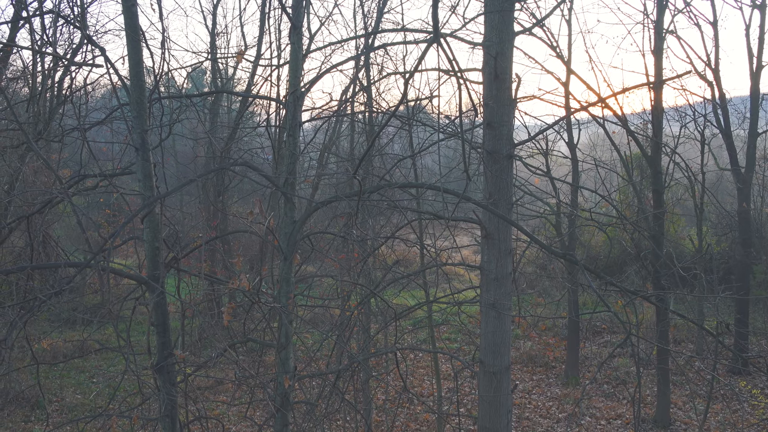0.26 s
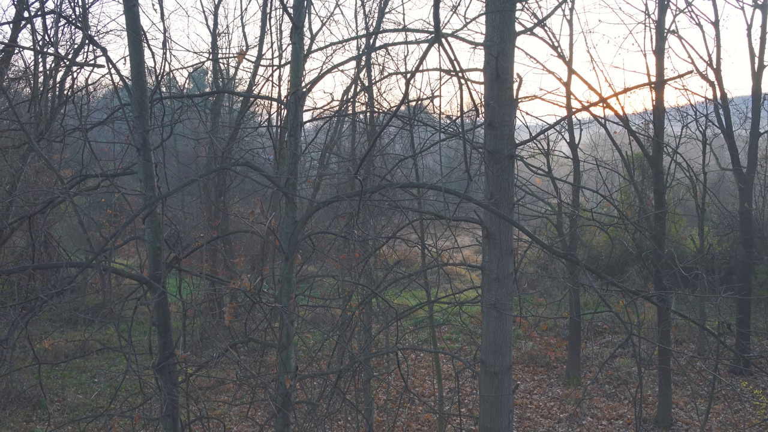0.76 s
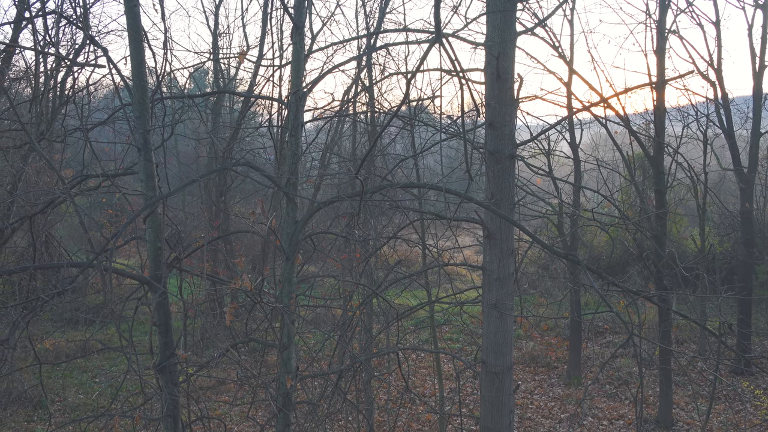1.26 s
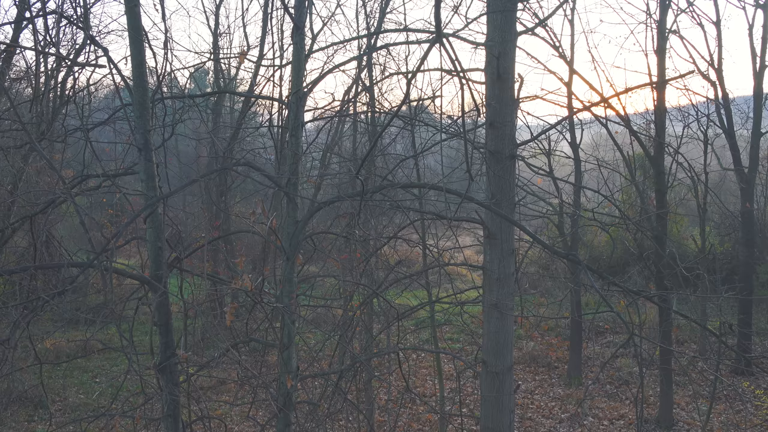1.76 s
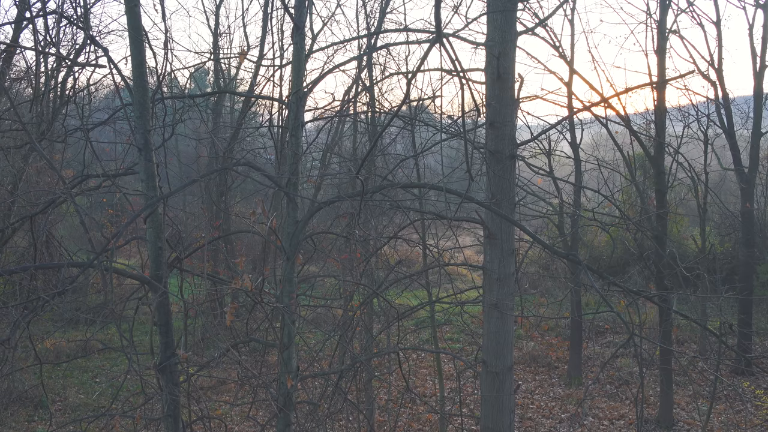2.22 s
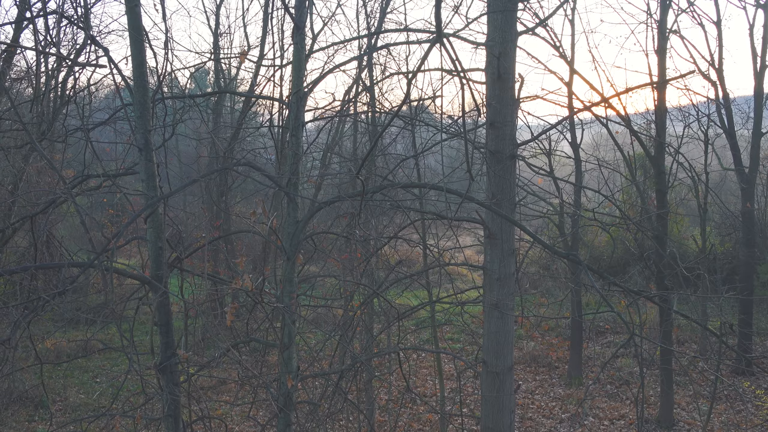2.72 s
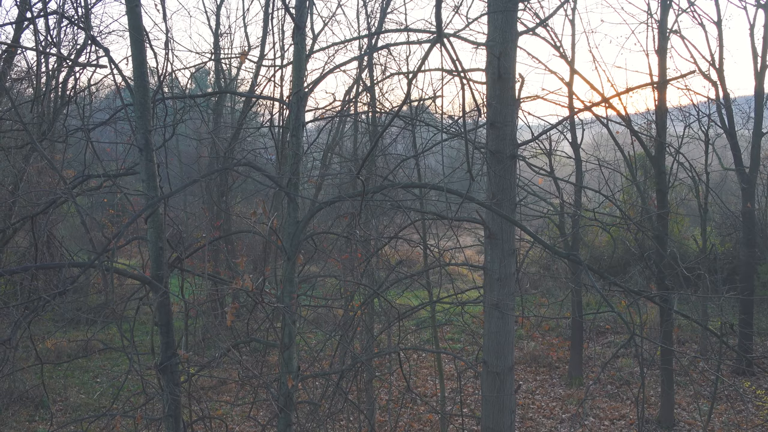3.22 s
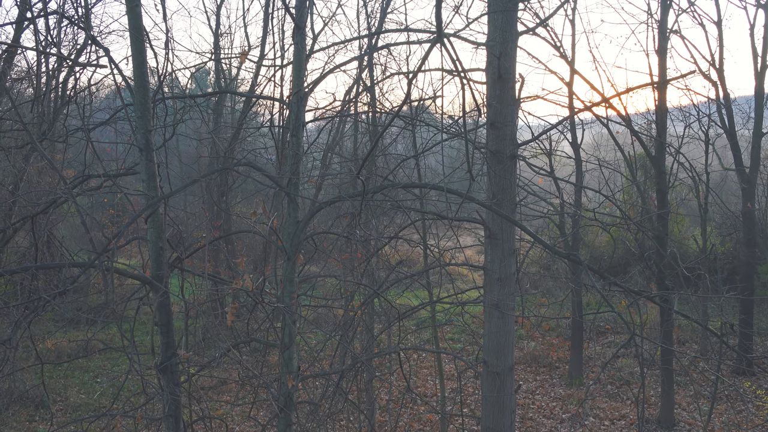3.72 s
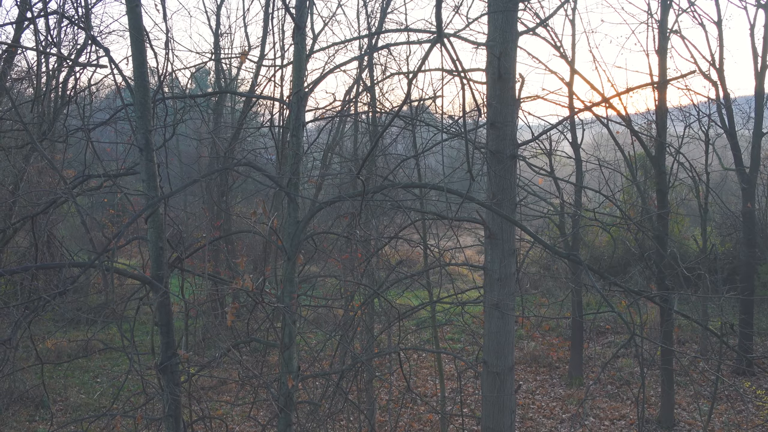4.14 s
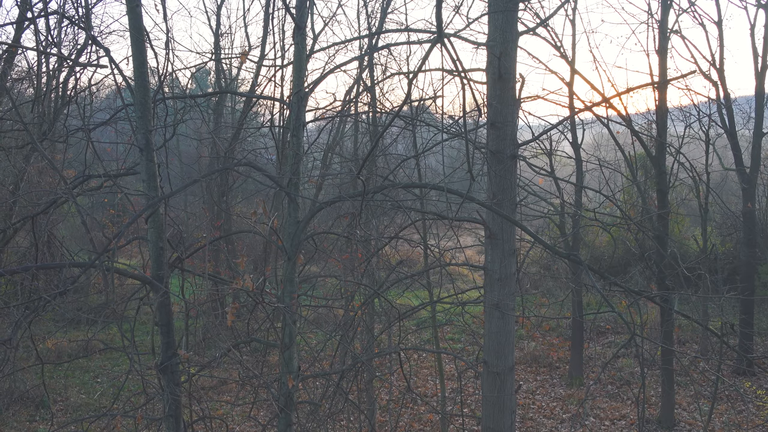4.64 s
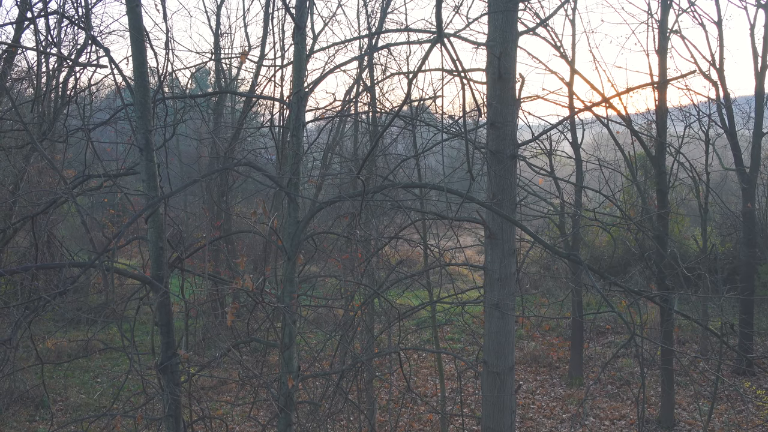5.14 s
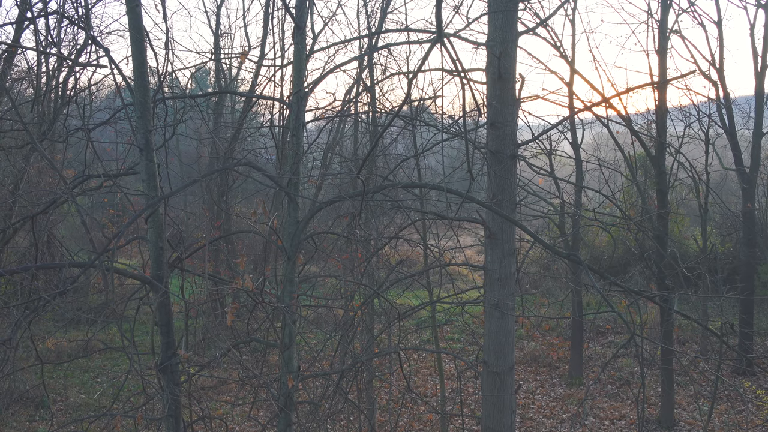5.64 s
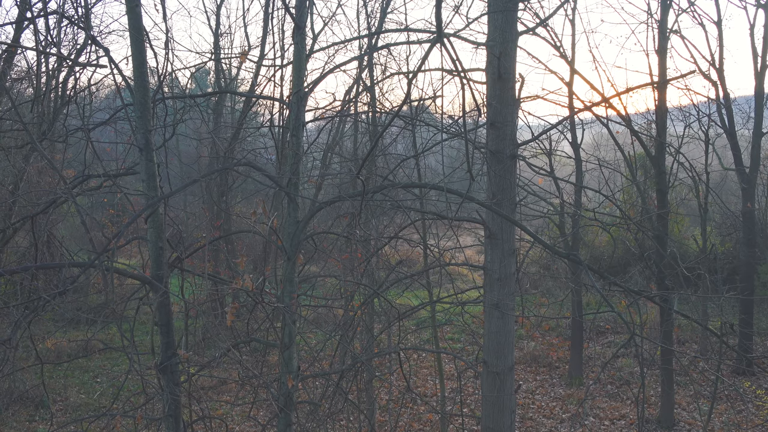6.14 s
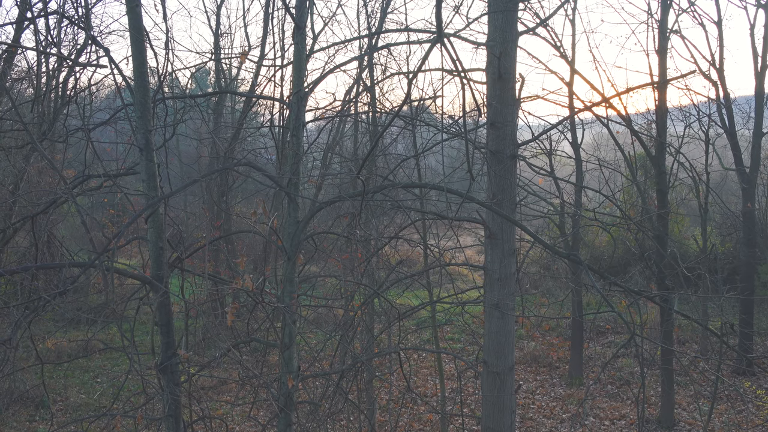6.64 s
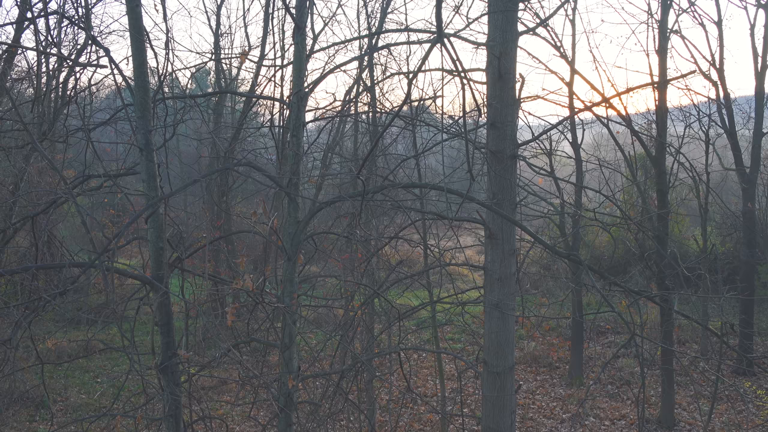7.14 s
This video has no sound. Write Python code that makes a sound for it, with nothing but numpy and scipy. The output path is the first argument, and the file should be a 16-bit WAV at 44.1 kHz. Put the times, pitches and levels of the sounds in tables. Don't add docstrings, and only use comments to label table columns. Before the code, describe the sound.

Overlapping crow caws echo softly among leafless trunks over a distant flock's haze, with thin songbird chirps, paired jay whistles and faint hum.

```python
import sys
import numpy as np
from scipy import signal
from scipy.fft import rfft, irfft, next_fast_len
from scipy.io import wavfile

SR = 44100
rng = np.random.default_rng(int(sys.argv[2]) if len(sys.argv) > 2 else 0)


def put_to_file(sound):
    columns = np.atleast_2d(sound).T
    safe = np.clip(columns, -1, 1)
    whole_steps = np.round(safe * 32767)
    wavfile.write(sys.argv[1], SR, whole_steps.astype(np.int16))


def to_linear_factor(level_db):
    exponent = np.asarray(level_db, float) / 20
    return 10 ** exponent


N = 325017

# peak in seconds, tail in seconds, level in dB, third partial in dB relative to the level.
TWO_LINE_CAWS = [(.02, 0.06, -39, -14), (.73, .05, -61, 2), (1.091, 0.076, -48, -1),
                 (2.228, 0.11, -49, -1.5), (3.988, 0.12, -43.5, -2.5), (4.346, 0.12, -43, 0.5),
                 (4.648, 0.15, -44.5, -2.5), (5.024, 0.073, -46, 2), (5.69, .16, -46.5, 0),
                 (6.088, .19, -44.5, -4), (6.452, 0.17, -42, -8), (6.93, 0.15, -42.5, -7.5),
                 (7.093, 0.082, -60, -13), (7.27, 0.12, -45, -6.5)]
HIGH_CAWS = [(1.42, 0.22, -51, -9), (1.871, 0.18, -57, -22), (2.788, 0.093, -54, -8),
             (2.991, 0.091, -50.5, -25), (3.228, 0.16, -46, -9)]
# peak in seconds, tail in seconds, level in dB.
ONE_LINE_CAWS = [(.42, 0.2, -46.5), (.814, 0.087, -46), (1.166, 0.097, -43.5), (1.491, 0.13, -50),
                 (1.831, 0.082, -44), (2.096, 0.067, -45), (2.447, 0.086, -45), (2.728, 0.1, -42.5)]
NEIGHBOUR_CAWS = [(4.7, 0.059, -46), (4.979, 0.039, -49), (5.096, 0.058, -40), (5.757, 0.069, -45),
                  (5.969, 0.036, -49), (6.171, 0.041, -45), (6.919, 0.099, -56), (7.128, 0.077, -43.5),
                  (7.33, .06, -58)]
# pitch in Hz, attack in seconds, rise in dB, fall in dB.
THROATS = [
    (600, .052, 9, 12),
    (655, .08, 9, 14),
    (499, .06, 8, 13),
    (487, .055, 8, 10),
]
# multiple of the pitch, level in dB.
TWO_LINE_PARTIALS = [(2, 0), (2.5, -5), (3.5, -19), (4, -25), (5, -24), (5.5, -24), (6, -25)]
# multiple of the pitch, level in dB.
ONE_LINE_PARTIALS = [(2.5, -12), (3, 0), (3.5, -16), (5, -25), (6.5, -28)]
# start in seconds, length in seconds, strongest partial from Hz, to Hz, level in dB.
SLIDING_CAWS = [(0, 0.064, 1876, 1687, -46.5), (.03, 0.2, 1740, 1387, -46), (3.505, 0.041, 1370, 1900, -58),
                (3.532, 0.11, 1873, 1582, -49.5), (3.619, 0.22, 1555, 1792, -51.5),
                (3.76, 0.19, 1565, 1480, -57), (3.926, 0.076, 1640, 1816, -45.5),
                (4.0, 0.099, 1750, 1380, -46), (4.09, 0.08, 1438, 1487, -46.5),
                (4.32, .19, 1637, 1396, -49.5), (6.47, 0.25, 1717, 1430, -51),
                (5.19, 0.082, 914, 681, -50.5)]
# share of the length, share of the slide, level in dB.
SLIDE_SHAPE = [(0, 0.025, 0.5), (0.252, .45, -1), (.6, .75, -0.5), (1, 1, -8)]
# multiple of the strongest partial, level in dB.
SLIDE_PARTIALS = [(0.668, -26), (1, 3), (1.332, -19), (1.667, -21), (2.001, -27)]
# start in seconds, length in seconds, top of second partial in Hz, level in dB.
NEAR_CAWS = [
    (5.174, .325, 1144, -34.5),
    (5.724, 0.28, 1148, -49.5),
]
# share of the length, share of the top pitch, level in dB.
NEAR_SHAPE = [(0, .87, -14), (.1, .84, -4), (.2, .9, -2), (.25, .9, -6), (.29, .98, 0), (.45, 1, -2),
              (.57, .94, 0), (.76, .85, -2), (.86, .77, -10), (1, .76, -28)]
# multiple of the pitch, level in dB.
NEAR_PARTIALS = [(1.25, -20), (1.5, -19), (1.75, -16), (2, 0), (2.25, -16), (2.5, -15), (3.25, -16),
                 (4, -13), (5, -22), (6, -24)]
# start in seconds, hold in seconds, release in seconds, level in dB.
RASPS = [
    (-.1, 0.11, 0.22, -63.5),
    (3.947, 0.1, 0.11, -69),
    (5.172, 0.17, 0.21, -55),
]
# frequency in Hz, density in dB per Hz.
RASP_SPECTRUM = [(480, -40), (680, -20), (1400, -15), (2100, -19), (2600, -24), (3400, -21), (5600, -26),
                 (8000, -36), (11000, -52), (14000, -90)]
# start in seconds, length in seconds, top of fourth partial in Hz, level in dB.
JAY_WHISTLES = [
    (2.472, 0.33, 3570, -53),
    (3.205, 0.36, 3582, -55),
    (5.637, .335, 3567, -53.5),
    (6.349, 0.352, 3575, -55),
]
# share of the length, share of the top pitch, level in dB.
JAY_SHAPE = [(-.025, .82, -14), (0, .94, -7), (.075, 1, 0), (.4, .982, -1.5), (.89, .918, -1.5),
             (.99, .895, -3), (1.03, .79, -8)]
# multiple of the pitch, level in dB.
JAY_PARTIALS = [(2, -12), (3, -11), (4, 0), (6, -18), (7, -29), (8, -29)]
# start in seconds, top of second partial in Hz, its end in Hz, level in dB,
# third partial in dB relative to the level.
CHIPS = [(.172, 4300, 3200, -61.5, 0), (.851, 4050, 3970, -61.5, 7), (.859, 4280, 3770, -60, -20),
         (1.364, 4620, 3010, -55.5, -23), (1.365, 4050, 4000, -57.5, 2.5), (2.2, 4130, 4070, -57.5, 1),
         (2.205, 4460, 3660, -57.5, -20), (2.82, 3615, 3160, -53, 4.5), (2.833, 4230, 3950, -56, -8),
         (3.066, 3710, 3310, -64, 6), (3.076, 4130, 3040, -65, -16), (3.598, 3950, 3360, -60.5, -12),
         (4.068, 4310, 3460, -56.5, -5), (4.516, 4020, 2920, -55.5, -3.5), (5.143, 3720, 3390, -55.5, -1),
         (5.146, 4310, 3730, -53, -7), (5.591, 4600, 3520, -66.5, -25), (5.871, 4210, 3570, -51.5, -8.5),
         (6.205, 4490, 3550, -63, -20), (6.475, 4450, 3690, -56, -22), (6.476, 4070, 3930, -60, 4),
         (6.884, 3980, 3590, -64.5, -3), (7.137, 3830, 3000, -62.5, 2)]
# multiple of the pitch, level in dB.
CHIP_PARTIALS = [(1, -3), (2, 2.5), (4, -28)]
# start in seconds, length in seconds, lowest pitch in Hz, level in dB.
SEEPS = [
    (0.244, 0.14, 7310, -52.5),
    (1.38, 0.1, 7430, -61.5),
    (3.174, 0.15, 7150, -56),
    (4.922, 0.11, 7420, -47.5),
]
# share of the length, share of the lowest pitch, level in dB.
SEEP_SHAPE = [(0, 1.22, -11), (.14, 1.075, -4), (.32, 1.025, 0), (.65, 1, -2), (1, 1.01, -12)]
# start in seconds, from Hz, top in Hz, level in dB.
WARBLES = [(.352, 7980, 8560, -58), (1.462, 7400, 8300, -63), (3.27, 7620, 8680, -51),
           (3.31, 7900, 9000, -60), (5.0, 7760, 8900, -40.5), (5.03, 7730, 9240, -47)]
# seconds after its start, share of the leap, level in dB.
WARBLE_SHAPE = [(0, 0, -3), (.011, 1, -8), (.021, .3, -1), (.034, 0, -6)]
# start in seconds,
# length in seconds, from Hz, to Hz, level in dB.
PEEPS = [(6.685, .018, 5240, 6300, -58), (6.706, .02, 6350, 5700, -58), (6.825, .03, 5900, 5100, -60),
         (5.48, .07, 2650, 2480, -60), (5.56, .06, 2600, 2450, -63), (3.79, .09, 2880, 2740, -71),
         (3.82, .05, 2450, 2350, -64), (3.88, .08, 4020, 4050, -68), (6.865, .08, 2700, 2660, -66),
         (.9, .3, 4050, 4020, -72), (5.21, .045, 6260, 5800, -55), (5.6, .015, 8500, 8900, -66),
         (7.115, .02, 6900, 6800, -66), (.262, .08, 8500, 8000, -55), (1.385, .07, 8650, 8250, -69),
         (3.195, .07, 8100, 7600, -63)]
# start in seconds, from Hz, to Hz, level in dB.
FLICKS = [(.665, 5200, 7150, -63), (1.528, 5430, 7300, -68), (1.932, 5140, 7240, -64.5),
          (2.59, 5380, 7360, -63.5), (3.243, 5550, 7200, -68), (4.004, 5850, 6900, -68),
          (4.44, 5900, 7270, -67.5)]
# time in seconds, level in dB.
FLOCK_LEVEL = [(0.0, -38), (0.14, -40.5), (.27, -48.5), (.5, -50.5), (0.92, -54.5), (1.33, -53),
               (1.68, -55), (2.4, -50.5), (3.18, -53.5), (3.35, -66), (3.59, -55), (3.75, -50.5),
               (4.21, -45.5), (4.99, -48.5), (5.23, -45), (5.77, -50), (6.8, -48), (7.08, -48.5),
               (7.37, -49.5)]
# frequency in Hz, 60 dB decay time in seconds.
WOOD_DECAY = [(800, 1), (3000, 0.75), (8000, 0.3)]
# time in seconds, level in dB.
WIND_LEVEL = [(0.0, -36), (0.1, -30), (1.19, -38), (1.99, -38), (2.13, -30), (2.26, -36), (2.71, -30.5),
              (3.12, -36), (3.76, -37.5), (4.53, -30.5), (4.7, -43.5), (4.91, -31.5), (5.48, -40.5),
              (5.97, -31.5), (6.44, -39.5), (7.18, -27.5), (7.37, -37.5)]
# frequency in Hz, density in dB per Hz.
WIND_SPECTRUM = [(2, -14), (5, -3), (11, 0), (17, -6), (25, -13), (31, -19.5), (40, -27), (60, -36),
                 (150, -60), (200, -120)]
# frequency in Hz, density in dB per Hz.
HUM_HISS_SPECTRUM = [(26, -40), (45, -3), (162, -3.5), (207, -7.5), (346, -8.5), (391, -10.5), (465, -10),
                     (902, -11.5), (1630, -19.5), (1800, -20.5), (2530, -28.5), (2940, -32.5),
                     (3400, -34.5), (4140, -32.5), (16000, -41.5)]

HOARSE, FLUTTER = .02, .7
ARCH, SAG = .07, 1.45
RASP_ATTACK_S, RASP_RISE_DB, RASP_FALL_DB = .06, 10, 16
CHIP_RISE_S, CHIP_FALL_S, CHIP_FALL_S_PER_KHZ = 0.012, 0.0141, .016
TRUNK_S, TRUNK_DB = .013, -5
PEEP_FADE_DB = 3
HUM_HISS_DB = -48
TOP_HZ = 15730


def crows():
    out = np.zeros(N)
    caw_lists = [TWO_LINE_CAWS, HIGH_CAWS, ONE_LINE_CAWS, NEIGHBOUR_CAWS]
    partials = [TWO_LINE_PARTIALS, TWO_LINE_PARTIALS, ONE_LINE_PARTIALS, ONE_LINE_PARTIALS]
    for caws, (hz, attack, rise_db, fall_db), orders in zip(caw_lists, THROATS, partials):
        for s, tail, db, *third_db in caws:
            onset = (max(s - attack, 0), db - rise_db * min(s / attack, 1))
            swell = [onset, (s, db), (s + tail, db - fall_db)]
            caw = [(t, hz, a, *(a + b for b in third_db)) for t, a in swell]
            add_call(out, caw, orders, line=0.97, jitter=HOARSE, rough=FLUTTER, arch=ARCH * (s > attack))
    for s, long, from_hz, to_hz, db in SLIDING_CAWS:
        caw = [(s + u * long, from_hz + v * (to_hz - from_hz), db + a) for u, v, a in SLIDE_SHAPE]
        add_call(out, caw, SLIDE_PARTIALS, line=1, jitter=.9 * HOARSE, rough=.6 * FLUTTER)
    return out


def near_crow():
    out = rasp()
    for caw in NEAR_CAWS:
        add_call(out, shaped(NEAR_SHAPE, *caw), NEAR_PARTIALS, line=2, jitter=.022, rough=.35, fade=.008)
    return out


def rasp():
    envelope, t = np.zeros(N), np.arange(N) / SR
    chopped = rng.standard_normal(N) * to_linear_factor(1.05 * wobble(140))
    breath = coloured(chopped, RASP_SPECTRUM)
    for s, hold, release, db in RASPS:
        full = max(s + RASP_ATTACK_S, 0)
        end = full + hold + release
        knots = np.array([s - .03, s, s + RASP_ATTACK_S, full + hold, end, end + 0.054])
        levels = [-60, -RASP_RISE_DB, -1.5, 0, -RASP_FALL_DB, -60]
        envelope += to_linear_factor(db + 10.5 + np.interp(t, knots, levels))
    return envelope * breath


def jay():
    out = np.zeros(N)
    for whistle in JAY_WHISTLES:
        add_call(out, shaped(JAY_SHAPE, *whistle), JAY_PARTIALS, line=4, jitter=.004, rough=.22, fade=.005)
    return out


def songbirds():
    hooked = to_linear_factor(-1.8) * wood(chips(), wet_db=-2.5, stretch=.8, far_db=-7)
    thin = to_linear_factor(-4) * wood(seeps(), wet_db=3, stretch=1.2, far_db=1.5)
    return hooked + thin + wood(flicks(), wet_db=7, stretch=1.3, far_db=6)


def chips():
    out = np.zeros(N)
    for s, top_hz, end_hz, db, third_db in CHIPS:
        fall = CHIP_FALL_S + CHIP_FALL_S_PER_KHZ * abs(top_hz - end_hz) / 1000
        hook = [(0, .7 * top_hz, -5, -15),
                (0.6 * CHIP_RISE_S, .92 * top_hz, -2, -4),
                (CHIP_RISE_S, top_hz, 0, 0),
                (CHIP_RISE_S + 0.5 * fall, .4 * top_hz + .6 * end_hz, -1, -9),
                (CHIP_RISE_S + fall, end_hz, -5, -28)]
        chip = [(s + t, hz, db + a, db + third_db + b) for t, hz, a, b in hook]
        add_call(out, chip, CHIP_PARTIALS, line=2, jitter=.012, rough=.3, fade=.002)
    return out + to_linear_factor(TRUNK_DB) * np.roll(out, round(TRUNK_S * SR))


def seeps():
    out = np.zeros(N)
    calls = [shaped(SEEP_SHAPE, *seep) for seep in SEEPS]
    for s, low_hz, top_hz, db in WARBLES:
        calls.append([(s + t, low_hz + v * (top_hz - low_hz), db + a) for t, v, a in WARBLE_SHAPE])
    for s, long, from_hz, to_hz, db in PEEPS:
        calls.append([(s, from_hz, db), (s + long, to_hz, db - PEEP_FADE_DB)])
    for call in calls:
        add_call(out, call, [(1, 0)], line=1, jitter=.013, rough=.4, fade=.003)
    return out


def flicks():
    out = np.zeros(N)
    for s, from_hz, to_hz, db in FLICKS:
        flick = [(s, from_hz, db), (s + .014, .95 * to_hz, db - 2.5), (s + .022, to_hz, db - 8)]
        add_call(out, flick, [(1, 0)], line=0.99, jitter=0.0077, fade=0.0018)
    return out


def flock(count=120):
    caws = np.zeros(N)
    for when, pitch, size, length in rng.random((count, 4)):
        s, hz, long = when * N / SR, 440 + 200 * pitch, 0.1202 + 0.1229 * length
        arch = [(s, .93 * hz, -6), (s + 0.3897 * long, hz, 0), (s + long, .9 * hz, -8)]
        partials = [(2, -4 - 6 * size), (3, -6 * size)]
        add_call(caws, arch, partials, line=0.99, jitter=2.61 * HOARSE, rough=1.26 * FLUTTER)
    caws = coloured(caws, [(700, -39), (1100, -12.0), (1250, 2.5), (1550, -1.0), (1800, -5.5),
                           (2050, -12), (4000, -37)])
    breath = coloured(rng.standard_normal(N), [(1800, -30), (2250, -1), (2850, -5), (3500, -1),
                                               (4400, -13), (6500, -28), (9000, -50)])
    blur = coloured(rng.standard_normal(N), [(800, -38), (1150, -1.0), (1520, -4), (1850, -3.5),
                                             (2200, -16.5), (4000, -57)])
    haze = to_linear_factor(-14.5 + 1.5 * wobble(6)) * breath + to_linear_factor(-3 + 2.5 * wobble(9)) * blur
    s, db = np.transpose(FLOCK_LEVEL)
    return (caws + haze) * to_linear_factor(np.interp(np.arange(N) / SR, s, db) - 4.5)


def air():
    s, db = np.transpose(WIND_LEVEL)
    gusts = to_linear_factor(np.interp(np.arange(N) / SR, s, db))
    wind = gusts * coloured(rng.standard_normal(N), WIND_SPECTRUM)
    return wind + to_linear_factor(HUM_HISS_DB - 0.59) * coloured(rng.standard_normal(N), HUM_HISS_SPECTRUM)


def wood(x, wet_db, stretch, far_db=-11):
    hz, t, z = signal.stft(rng.standard_normal((2, SR)), SR, nperseg=256)
    t60 = stretch * along(WOOD_DECAY, hz)[:, None]
    decay = to_linear_factor(-60 * t / (0.64 * t60)) + to_linear_factor(far_db - 60 * t / t60)
    tails = signal.istft(z * decay, SR, nperseg=256)[1]
    tails = tails / np.linalg.norm(tails[0])
    drift = 2 * wobble(16)
    paths = signal.fftconvolve(x * [np.cos(drift), np.sin(drift)], tails, axes=1)
    return x + to_linear_factor(wet_db) * paths.sum(axis=0)[:N]


def add_call(out, rows, orders, line, jitter=0., rough=0., fade=0.007, arch=0.):
    start, gate, (hz, db, *third_db) = spread(rows, fade)
    size = len(hz)
    bend = np.interp(np.linspace(0, 1, size), [0, .25, 1], [1, 0, SAG]) ** 2
    pitch = hz * (1 - arch * bend) / line
    phase = 2 * np.pi * np.cumsum(pitch * (1 + jitter * wobble(189.7, size))) / SR
    levels = [(k, db + rel_db) for k, rel_db in orders] + [(3, c) for c in third_db]
    for k, level_db in levels:
        depth = rough * (1 if k % 1 == 0 else 4)
        flutter = (1 + depth * wobble(109.7, size)) / np.sqrt(1 + depth ** 2)
        partial = np.sin(k * phase + k * k)
        out[start:start + size] += np.sqrt(2) * gate * to_linear_factor(level_db) * flutter * partial


def spread(rows, fade):
    s, *cols = np.transpose(rows)
    t = np.arange(round(s[0] * SR), min(round(s[-1] * SR), N)) / SR
    since_start = t - s[0] + (s[0] == 0)
    gate = np.clip(np.minimum(since_start, s[-1] - t) / fade, 0, 1)
    return round(s[0] * SR), gate, [np.interp(t, s, c) for c in cols]


def shaped(shape, s, long, hz, db):
    return [(s + u * long, share * hz, db + rel_db) for u, share, rel_db in shape]


def coloured(x, spectrum):
    m = next_fast_len(len(x) + 8192)
    gain = to_linear_factor(along(spectrum, np.fft.rfftfreq(m, 1 / SR)))
    return unit(irfft(rfft(x, m) * gain, m)[:len(x)])


def along(points, hz):
    f, v = np.transpose(points)
    return np.interp(np.log(hz + 1), np.log(f + 1), v)


def wobble(rate, size=N):
    knots = rng.standard_normal(int(size * rate / SR) + 2)
    return 1.2 * np.interp(np.arange(size) * rate / SR, np.arange(len(knots)), knots)


def unit(x):
    return x / np.sqrt(np.mean(x ** 2) + 1e-20)


def scene():
    voices = to_linear_factor(-3) * wood(crows(), wet_db=-3.5, stretch=.9)
    near = to_linear_factor(-1.5) * wood(near_crow() + jay(), wet_db=-9, stretch=.9)
    far = to_linear_factor(-5) * wood(flock(), wet_db=3, stretch=1.6)
    return (voices + near + far + songbirds() + air())[None]


def top_cut(x):
    return signal.sosfilt(signal.butter(12, 16680, fs=SR, output="sos"), x)


def record(dry):
    m = next_fast_len(N)
    passband = np.fft.rfftfreq(m, 1 / SR) < TOP_HZ
    kept = irfft(rfft(dry, m) * passband, m)[:, :N]
    return top_cut(kept)


dry = scene()
out = record(dry)
put_to_file(out)
```